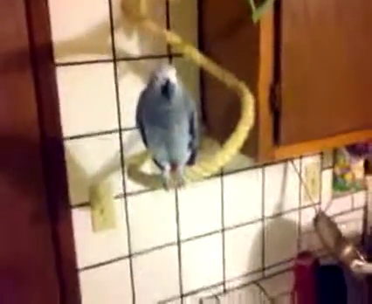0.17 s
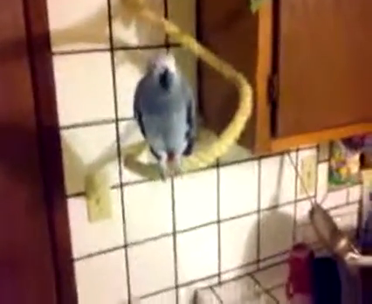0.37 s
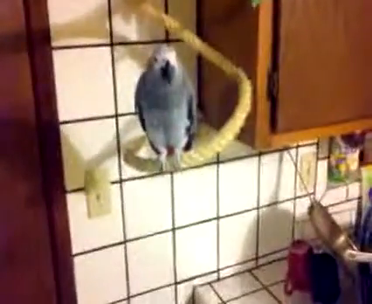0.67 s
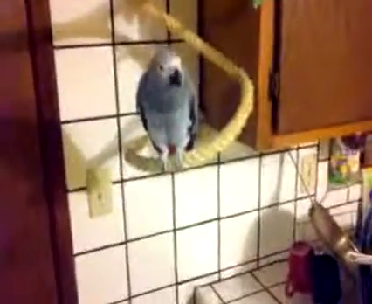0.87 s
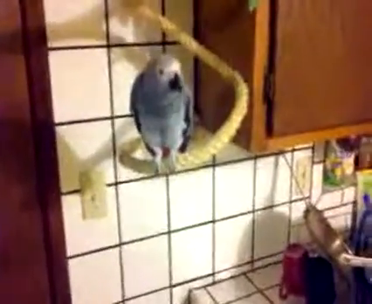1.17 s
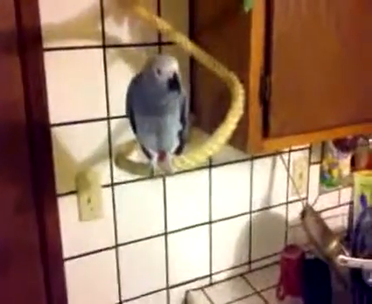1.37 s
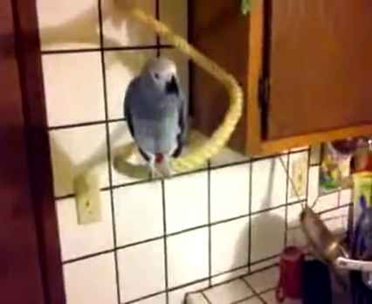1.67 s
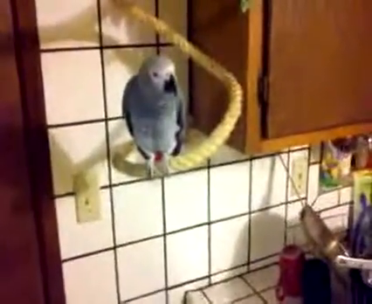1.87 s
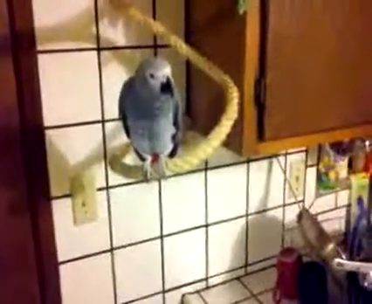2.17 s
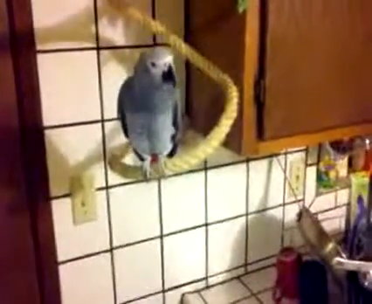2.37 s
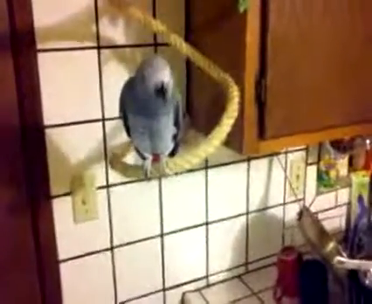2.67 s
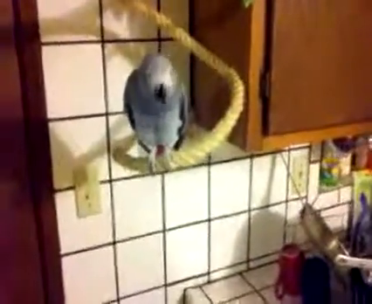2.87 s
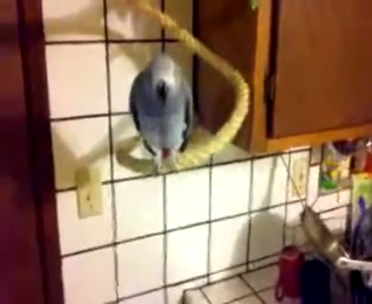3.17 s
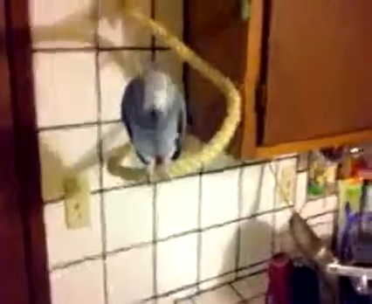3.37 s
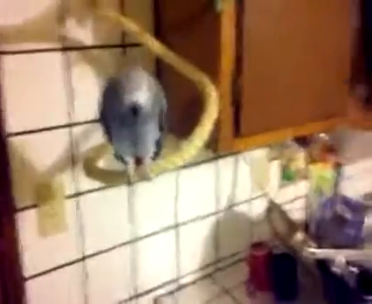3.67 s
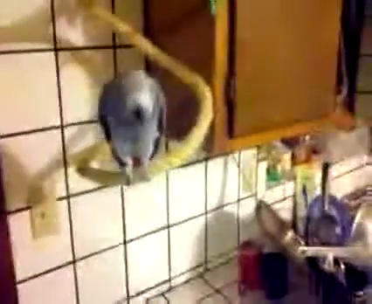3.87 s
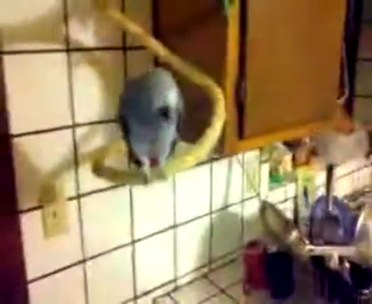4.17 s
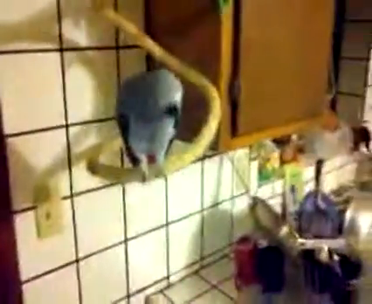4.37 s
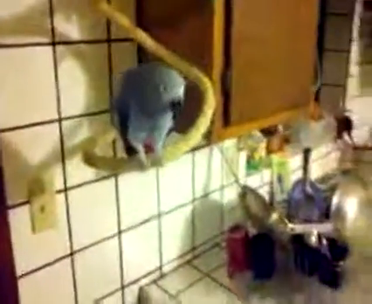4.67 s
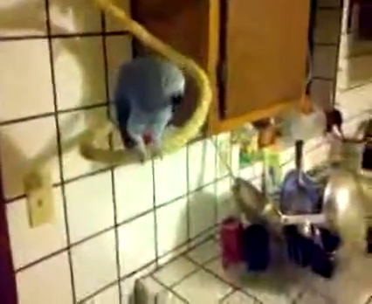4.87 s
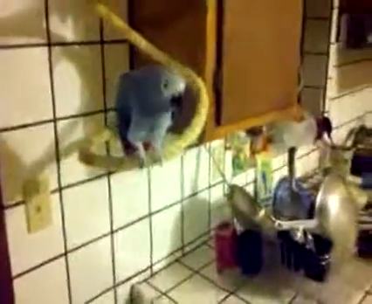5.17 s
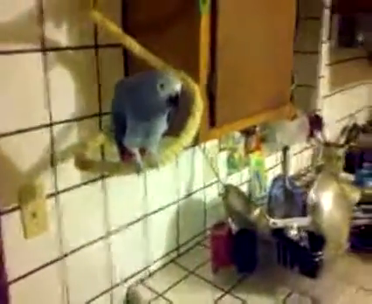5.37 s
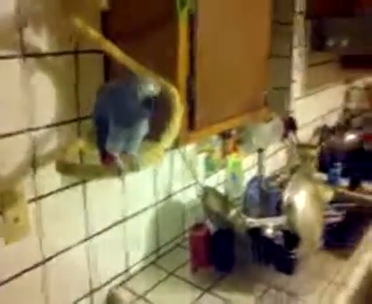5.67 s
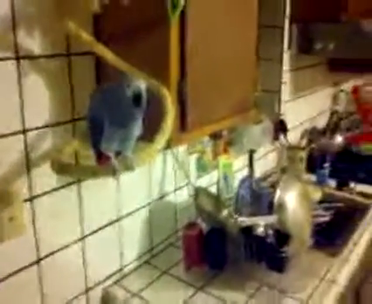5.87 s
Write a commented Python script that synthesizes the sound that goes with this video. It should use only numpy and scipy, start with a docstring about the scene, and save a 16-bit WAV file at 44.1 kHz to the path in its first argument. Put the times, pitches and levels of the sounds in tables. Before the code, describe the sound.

Single sharp clicks from a parrot's mouth repeat steadily, like a hard tongue cluck with a woody pop and bright edge, varying slightly each time. Hard tiles and cupboards throw them back in a brief, bright reverberation. The series breaks off once, leaving only low fluctuating hum and soft hiss, then continues at the same pace. It is heard indoors through a small camera's stereo microphones, wide and slightly compressed, with no extreme highs.

```python
"""In a kitchen, a grey parrot on a rope perch clicks its tongue about three times a second, with one pause.
Each click is a single snap that rings the bird's mouth and throat; tiled walls and cupboards throw it back.
A low, wavering hum and a faint hiss, both made of shaped noise, fill the room.
The camera's two close microphones are widened in stereo, then limited and cut off in the high treble."""
import sys
import numpy as np
from scipy import signal
from scipy.fft import rfft, irfft, next_fast_len
from scipy.io import wavfile
from scipy.ndimage import uniform_filter1d, map_coordinates

SR = 44100
rng = np.random.default_rng(int(sys.argv[2]) if len(sys.argv) > 2 else 0)


def dump(signal):
    """Clip the signal to [-1, 1] and save it as 16-bit WAV at the path in sys.argv[1]."""
    limited = np.clip(np.atleast_2d(signal).T, -1, 1)
    pcm = np.round(limited * 32767).astype(np.int16)
    wavfile.write(sys.argv[1], SR, pcm)


N = 264820  # length in samples, about 6 s
SOUND_SPEED = 343  # m/s
MIC_GAP_M = 0.13  # effective distance between the two microphones
SNAP_S = 0.005  # the snap comes this long after the start of each click's sound


def gain_of(db):
    """Decibels to amplitude."""
    return 10 ** (np.asarray(db) / 20)


def read(points, hz):
    """A table joined by straight lines on a log-frequency axis."""
    f, value = np.transpose(points)
    return np.interp(np.log(hz + 1), np.log(f + 1), value)


def add(mix, s, sound):
    """Adds a stereo sound at time s, cut to the mix at both ends."""
    start = round(s * SR)
    part = mix[:, max(start, 0):]
    sound = sound[:, max(-start, 0):]
    part[:, :sound.shape[1]] += sound[:, :part.shape[1]]


def delayed(hz, seconds):
    """Spectrum of a pure delay: the phase turns back steadily with frequency."""
    return np.exp(-2j * np.pi * hz * seconds)


def peak(hz, centre_hz, width):
    """Gain of a steep resonance, 1 at its centre."""
    return 1 / (1 + ((hz ** 2 - centre_hz ** 2) / ((hz + 1) * width)) ** 2)


def ringing(resonances, hz):
    """Power spectrum of a set of resonances."""
    return sum((gain_of(db) * peak(hz, f, width)) ** 2 for f, width, db in resonances)


def causal(gain):
    """The minimum-phase spectrum with this gain: a sharp start, then ringing."""
    log_gain = np.log(np.maximum(gain, 1e-5))
    circle = np.concatenate([log_gain, log_gain[-2:0:-1]])
    return np.exp(np.conj(signal.hilbert(circle)))[:len(gain)]


def diffuse(pair, hz):
    """Two unrelated spectra become sound from all sides at two close microphones."""
    same = np.sinc(2 * hz * MIC_GAP_M / SOUND_SPEED)  # likeness of the two sides, highest in the bass
    mid = pair[0] * np.sqrt((1 + same) / 2)
    side = pair[1] * np.sqrt((1 - same) / 2)
    return np.array([mid + side, mid - side])


def excitation(t, burst_db=-4, rise_s=0.0012, fall_s=0.00092):
    """Spectrum of the click's excitation: one snap inside a very short burst of noise, SNAP_S after the start."""
    since = t - SNAP_S
    swell = np.exp(np.minimum(since / rise_s, -since / fall_s))
    burst = rng.standard_normal(len(t)) * swell
    push = gain_of(burst_db) * burst / np.linalg.norm(burst)
    push[round(SNAP_S * SR)] += 1
    return rfft(push)


def overtones(hz, ripple_db=4, from_hz=3200, spacing_hz=170):
    """Narrow upper resonances that fall differently with every set of tongue and beak."""
    heights = rng.standard_normal(400)
    ripple = map_coordinates(heights, [hz / spacing_hz], order=3, mode="mirror")
    return gain_of(ripple_db * ripple * hz ** 2 / (hz ** 2 + from_hz ** 2))


# The hollow knock of throat and tongue, alike in every click.
# Each row: pitch in Hz, width in Hz, level in dB.
KNOCK = [(795, 187, 11), (1250, 700, 9)]
# The crisp edge of beak, snap and tongue tip.
# Each row: pitch in Hz, width in Hz, level in dB against the click's own edge level.
EDGE = [(3600, 1400, 4), (6020, 2700, -2), (9540, 2200, 3)]


def mouth_and_throat(hz, mouth_hz, width, pop_db, edge_db, bright_db, low_hz=580, pivot_hz=6000):
    """Gain of the bird's body: resonances of throat, mouth and beak add their power."""
    octaves = np.clip(np.log2((hz + 1) / pivot_hz), -1, 1)  # the edge tilts around the pivot
    edge_gain = gain_of(edge_db + bright_db * octaves)
    pop = ringing([(mouth_hz, width, pop_db)], hz)
    power = ringing(KNOCK, hz) + pop + edge_gain ** 2 * ringing(EDGE, hz)
    small_body = 1 / np.sqrt(1 + (low_hz / (hz + 1)) ** 8)  # so small a source radiates little bass
    return np.sqrt(power) * overtones(hz) * small_body


# Standing waves of the corner between wall, cupboard and counter.
# Each row: pitch in Hz, width in Hz, height in dB of the peak added to a flat gain of 1.
CORNER = [(523, 100, 10), (722, 30, -1.5), (835, 110, -6), (1061, 28, 4), (1199, 9.1, -10.5), (1455, 38, 2),
          (1645, 110, -2.5), (1792, 150, -2), (2010, 59, -3), (2200, 32, -5), (2360, 17, 3),
          (2680, 21, -1.5), (2730, 48, -13), (3590, 90, 3.5), (3640, 69, -10.5), (4540, 62, -10.5),
          (8140, 43, -20.5), (10100, 150, -16)]


def corner(hz):
    """Gain of the corner: sound bouncing between its surfaces builds up at certain pitches."""
    return 1 + sum(gain_of(db) * peak(hz, f, width) for f, width, db in CORNER)


# Later reflections from the tiles and the cupboard beside the perch.
# Each row: typical delay in seconds, level in dB against the direct sound.
WALLS = [(.0047, -4), (.0068, -4), (0.0102, -2.5), (.014, -7.5)]


def direct_and_walls(hz, ears, near_echo_s=0.0024, echo_db=-3, echo_sway=0.25, sway=0.12,
                     wall_spread_s=0.00006):
    """Direct sound, a quick echo from the tiles right behind the perch, then the later reflections."""
    # each move of the head shifts the echo paths a little
    echo_s = near_echo_s * np.exp(echo_sway * rng.standard_normal())
    paths = 1 + gain_of(echo_db) * delayed(hz, echo_s)
    for delay_s, db in WALLS:
        stretch, lean = rng.standard_normal(2)
        arrival_s = delay_s * np.exp(sway * stretch) + ears * wall_spread_s * lean
        paths = paths + gain_of(db) * delayed(hz, arrival_s)
    return paths


def scatter(t, first_per_s=900, fill_s=0.012):
    """Reflections of random sign that grow denser with time, at even mean power."""
    chance = np.minimum(first_per_s * (1 + (t / fill_s) ** 2) / SR, 1)
    signs = rng.choice([-1., 1.], (2, len(t)))
    struck = rng.random((2, len(t))) < chance
    return signs * struck / np.sqrt(chance)


# Reverberation of the kitchen.
# Each row: pitch in Hz, seconds for the ring to fall by 60 dB.
KITCHEN = [(300, 0.67), (800, 0.56), (2000, 0.44), (4500, 0.55), (8000, 0.28), (11000, 0.32)]


def kitchen(taps, t, near_t60=0.19, far_db=-7, build_s=0.0012):
    """Spectra of the quick echoes around the perch and the longer ring of the whole room."""
    hz, when, z = signal.stft(taps, SR, nperseg=256)
    t60 = read(KITCHEN, hz)[:, None]
    fading = z * np.exp(-np.log(1000) * when / t60)
    far = signal.istft(fading, SR, nperseg=256)[1][:, :len(t)]
    near = taps * np.exp(-np.log(1000) * t / near_t60)
    near, far = (x / np.sqrt((x ** 2).sum() / 2) for x in (near, far))  # equal energy before far_db
    return rfft((near + gain_of(far_db) * far) * (1 - np.exp(-t / build_s)))


# The clicks; the first snap falls just before the start, so only its tail is heard.
# Each row: time of the snap in seconds, mouth resonance in Hz, its width in Hz, level of the mouth's pop
# in dB, level of the crisp edge in dB, brightness of the edge in dB per octave.
CLICKS = [(-0.0803, 2050, 1350, 22.5, 11.5, 3), (0.221, 2180, 1230, 24, 3, 1),
          (0.5142, 1863, 1320, 24.5, 10, -3), (0.8153, 2030, 1370, 23.5, 10.5, 1),
          (1.127, 1960, 1330, 22.5, 4, -0.5), (1.4536, 2040, 1400, 25.5, 6, 1),
          (2.5092, 2266, 980, 26, 1.5, 0), (2.8116, 1980, 600, 30, -0.5, 13),
          (3.0886, 2065, 950, 23.5, 13.5, 1), (3.387, 2200, 930, 22, -4.5, 7.5),
          (3.6626, 2230, 1290, 19, 3.5, -3), (3.9509, 2460, 1300, 18.5, 5, 1),
          (4.248, 1960, 1230, 23, 7.5, -1.5), (4.5447, 2060, 1100, 22, 8, -3),
          (4.8235, 2110, 1510, 23, 8.5, -2.5), (5.117, 2194, 1600, 25, 5, -3)]
# The bird turns its head to the camera and away again.
# Each row: time in seconds, direct sound and wall reflections against the room's ring in dB.
FACING = [(0, -6), (1.4, -8.5), (2.8, 0), (3.4, -1), (4, -5), (5.1, -6)]


def parrot(kept=0.22, thud_db=-43, right_db=0.7, size=32768):
    """One snap a click through the bird's resonances, then straight, off the walls and round the room."""
    t, hz = np.arange(size) / SR, np.fft.rfftfreq(size, 1 / SR)
    ears = np.array([[-.5], [.5]])  # left, right
    out = np.zeros((2, N))
    standing = scatter(t)  # the share "kept" of the room's echo power is the same for every click
    corner_gain = corner(hz)
    thud = gain_of(thud_db) / (1 + (hz / 300) ** 2)
    for s, mouth_hz, width, pop_db, edge_db, bright_db in CLICKS:
        body = mouth_and_throat(hz, mouth_hz, width, pop_db, edge_db, bright_db)
        ring = causal(body * corner_gain + gain_of(pop_db) * thud)
        paths = direct_and_walls(hz, ears)
        echoes = np.sqrt(kept) * standing + np.sqrt(1 - kept) * scatter(t)
        room = diffuse(kitchen(echoes, t), hz)
        direct_db = np.interp(s, *np.transpose(FACING))
        heard = excitation(t) * ring * (gain_of(direct_db) * paths + room)
        # the paths share the energy of the ring
        heard *= np.sqrt(np.mean(abs(ring) ** 2) / np.mean(abs(heard) ** 2))
        click = irfft(heard)[:, :size * 3 // 4]
        add(out, s - SNAP_S, gain_of(ears * right_db) * click)
    return out


def white_noise(count):
    """Spectra of unrelated white noises, each at 0 dB per Hz."""
    return rfft(rng.standard_normal((count, N))) * np.sqrt(SR / 2)


# Shape of the steady hiss of the room and the microphones.
# Each row: pitch in Hz, level in dB before the overall air_db is added.
AIR = [(20, -30.5), (60, -22), (120, -6.5), (300, 1.5), (450, 4), (700, -7), (1000, -6.5), (1500, -12),
       (2200, -12), (3200, -17), (4500, -20.5), (6300, -20), (8000, -17), (9500, -13.5)]


def hiss(air_db=-88.5, own_noise_db=-100, own_hz=150):
    """Shaped noise from all sides, plus a separate low noise in each microphone (levels in dB per Hz)."""
    hz = np.fft.rfftfreq(N, 1 / SR)
    air = diffuse(white_noise(2), hz) * gain_of(air_db + read(AIR, hz))
    own = white_noise(2) * gain_of(own_noise_db) / (1 + (hz / own_hz) ** 2)
    return irfft(air + own, N)


# Hum of a kitchen appliance.
# Each row: pitch in Hz, width in Hz, level in dB per Hz before the slow swell and the left-right balance.
HUM = [(164.2, 14, -84.5), (202, 18, -76), (224.2, 10, -76.5), (243, 63, -83.5)]
# The hum swells and sinks slowly.
# Each row: time in seconds, change of level in dB.
HUM_LEVEL = [(0, 1.5), (2.7, 3.5), (3.4, -6), (4.2, 0), (6, -1.5)]


def appliance_hum(left_db=1.5, shared=0.69, turn=0.39):
    """Noise in narrow bands wavers like a hum; it is partly shared by both sides and stronger on the left."""
    hz, t = np.fft.rfftfreq(N, 1 / SR), np.arange(N) / SR
    sides = np.array([[1], [-1]])  # left, right
    common, separate = white_noise(1), white_noise(2)
    drone = np.sqrt(shared) * common + np.sqrt(1 - shared) * separate
    drone = drone * np.exp(-1j * sides * turn)  # phase turn in radians, opposite on the two sides
    bands = sum(gain_of(db) * peak(hz, f, width) for f, width, db in HUM)
    swell_db = np.interp(t, *np.transpose(HUM_LEVEL))
    return irfft(drone * bands, N) * gain_of(swell_db + sides * left_db)


def scene():
    """The parrot in the kitchen, at the two microphones."""
    return parrot() + hiss() + appliance_hum()


# Lead of the left microphone over the right as sound bends round the camera.
# Each row: pitch in Hz, lead in radians.
PORTS = [(100, 1), (900, -0.07), (1550, -0.53), (2200, 2), (3100, 3.5), (3600, 4), (4400, -2), (5600, 0.4),
         (6300, 0.1), (7400, 2), (9400, 1.4), (10400, -0.1)]


def widen(x, from_hz=380, delay_samples=14):
    """Stereo widener: above the bass, each side subtracts a delayed copy of the other."""
    size = next_fast_len(N + SR // 10)
    hz = np.fft.rfftfreq(size, 1 / SR)
    lead = np.array([[.5], [-.5]]) * read(PORTS, hz)
    z = rfft(x, size) * np.exp(1j * lead)
    share = hz ** 2 / (hz ** 2 + from_hz ** 2)
    other = delayed(hz, delay_samples / SR) * z[::-1]
    return irfft((z - share * other) / np.sqrt(1 + share ** 2), size)[:, :N]


def limit(x, threshold_db=-14, slope=0.8, recover_db_per_s=100):
    """A quick limiter turns both sides down together when they are loud, then recovers steadily."""
    power = uniform_filter1d((x ** 2).mean(0), size=256)
    power_db = 10 * np.log10(abs(power) + 1e-12)
    fall = np.arange(N) * recover_db_per_s / SR
    held_db = np.maximum.accumulate(power_db + fall) - fall  # jumps up at once, sinks steadily
    over_db = np.maximum(held_db - threshold_db, 0)
    return x / gain_of(slope * uniform_filter1d(over_db, size=128))


def record(dry, cutoff_hz=11150):
    """Widener, limiter and a steep cut of the high treble."""
    low_pass = signal.firwin(401, cutoff_hz, window=("kaiser", 8), fs=SR)
    return signal.oaconvolve(limit(widen(dry)), low_pass[None], "same", axes=1)


dry = scene()
out = record(dry)
dump(out)
```